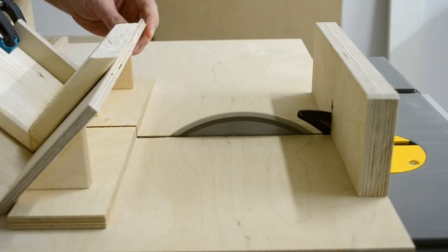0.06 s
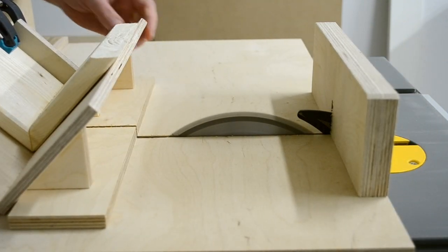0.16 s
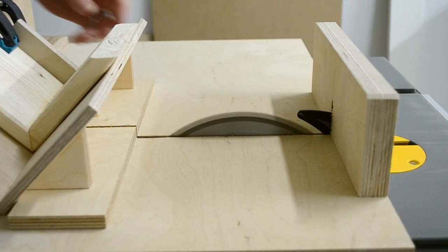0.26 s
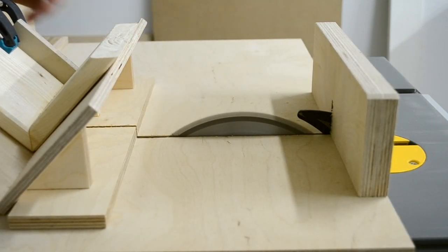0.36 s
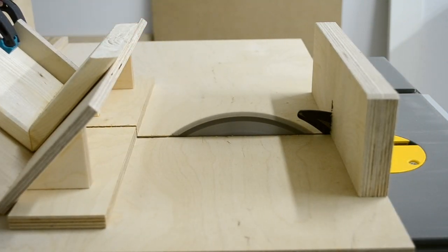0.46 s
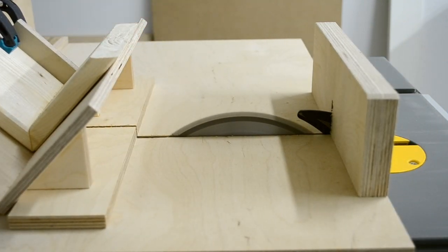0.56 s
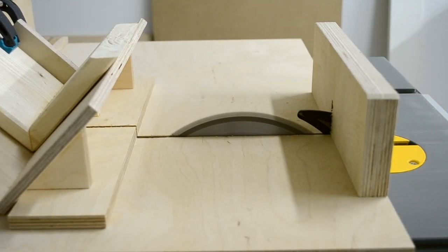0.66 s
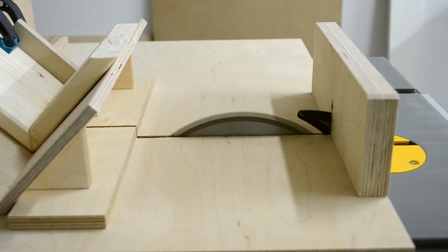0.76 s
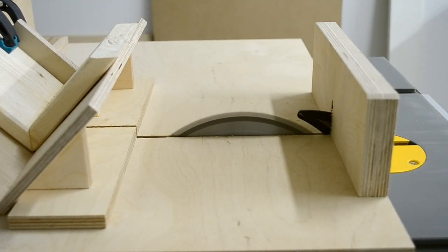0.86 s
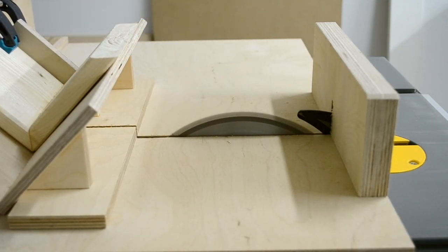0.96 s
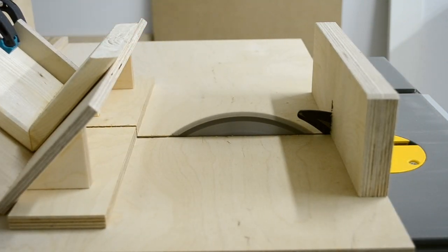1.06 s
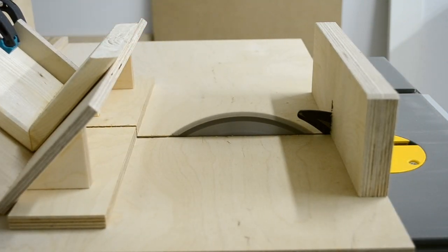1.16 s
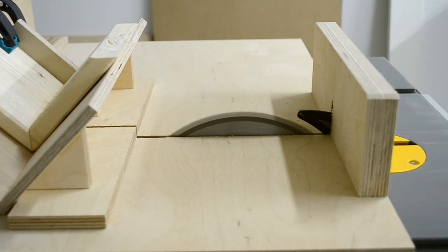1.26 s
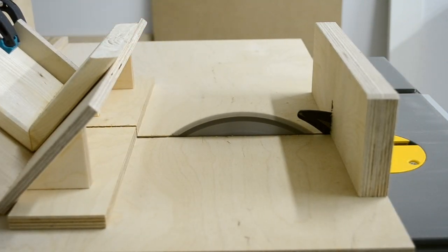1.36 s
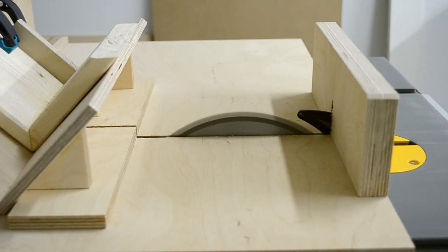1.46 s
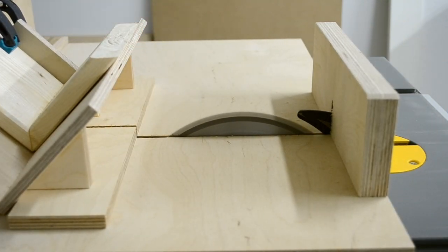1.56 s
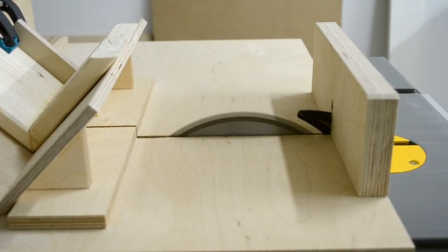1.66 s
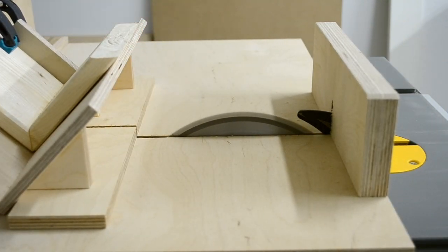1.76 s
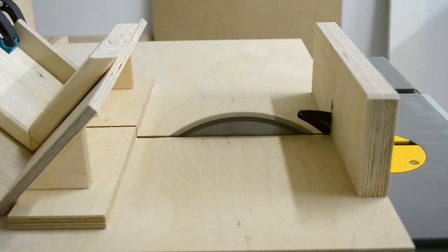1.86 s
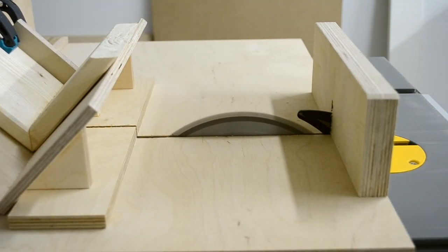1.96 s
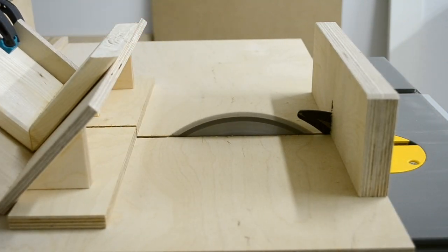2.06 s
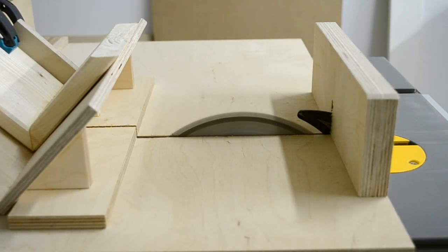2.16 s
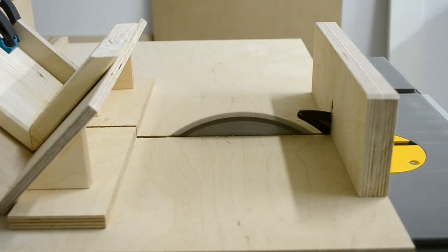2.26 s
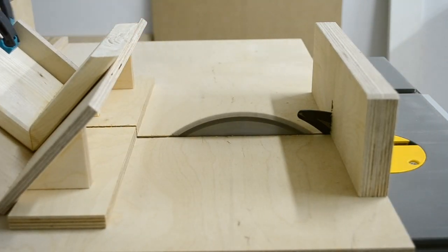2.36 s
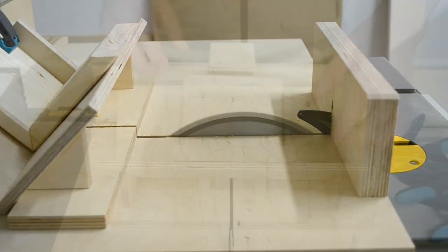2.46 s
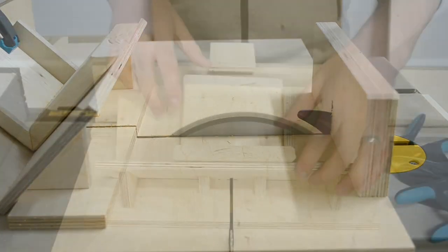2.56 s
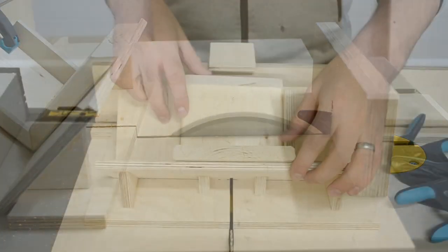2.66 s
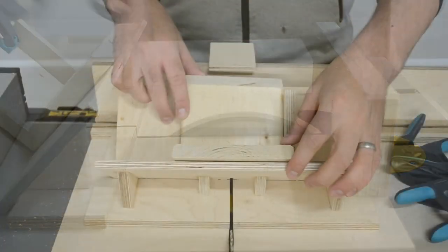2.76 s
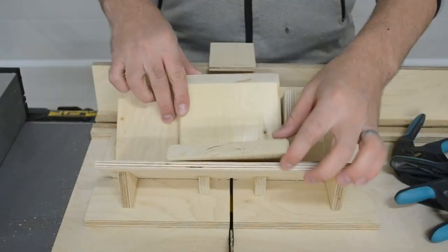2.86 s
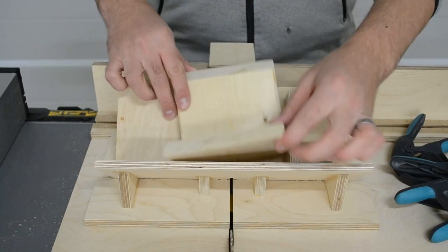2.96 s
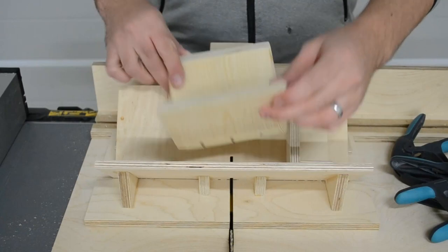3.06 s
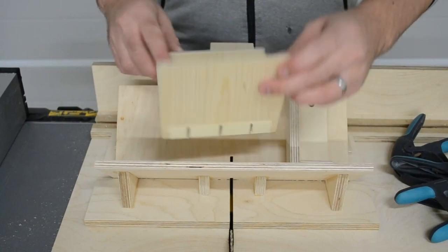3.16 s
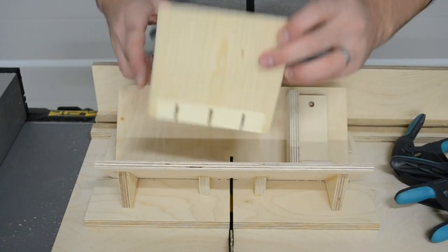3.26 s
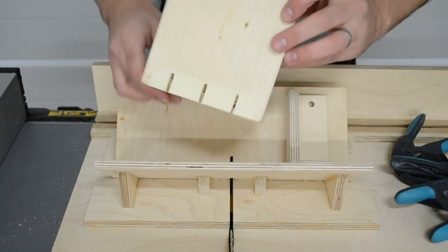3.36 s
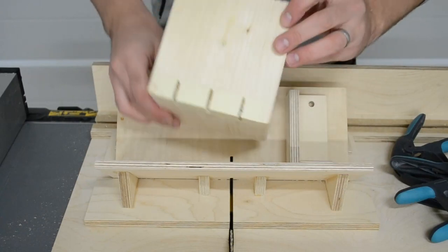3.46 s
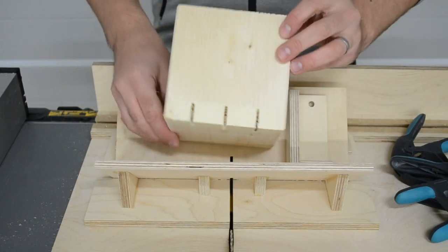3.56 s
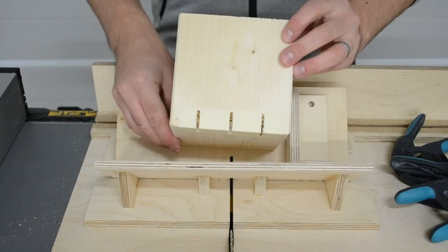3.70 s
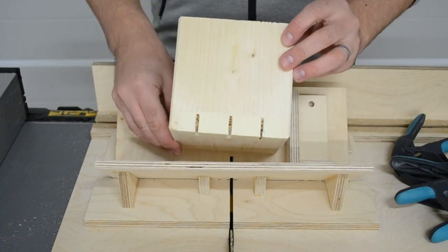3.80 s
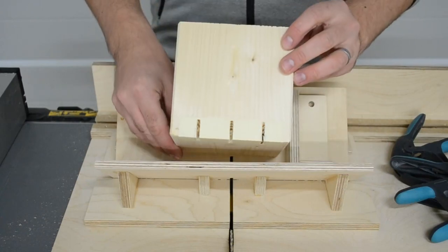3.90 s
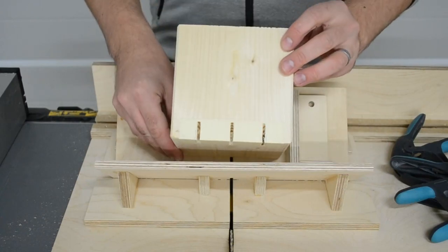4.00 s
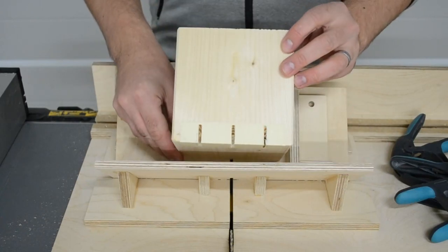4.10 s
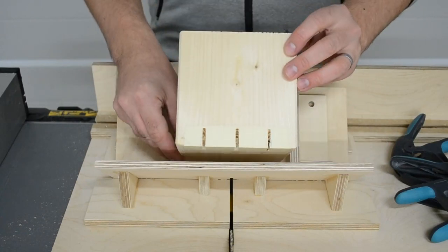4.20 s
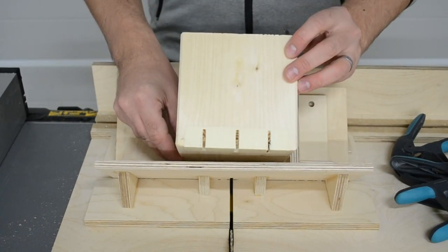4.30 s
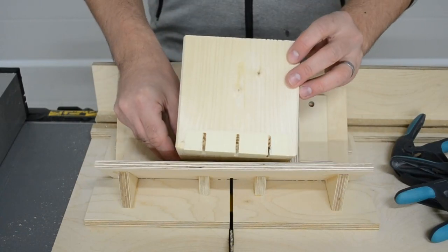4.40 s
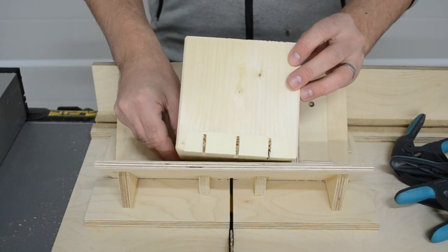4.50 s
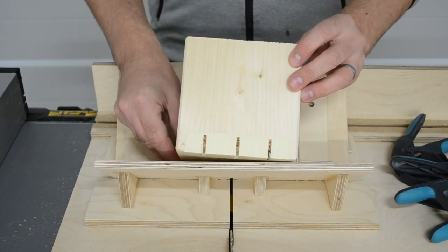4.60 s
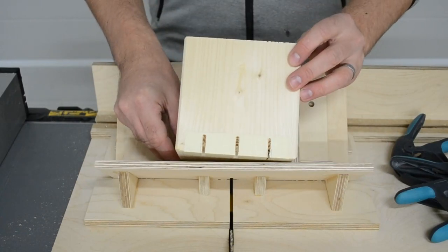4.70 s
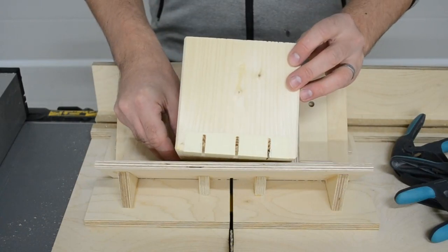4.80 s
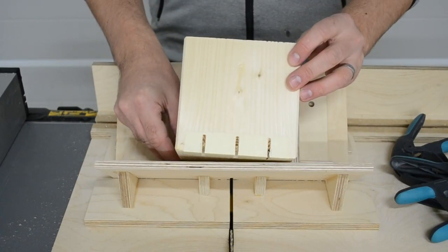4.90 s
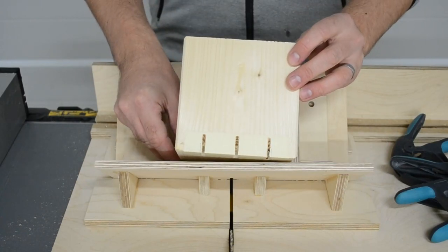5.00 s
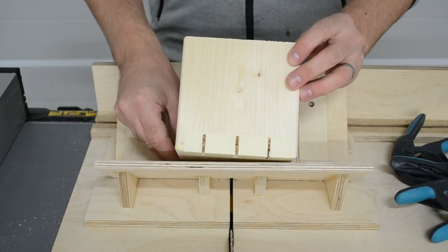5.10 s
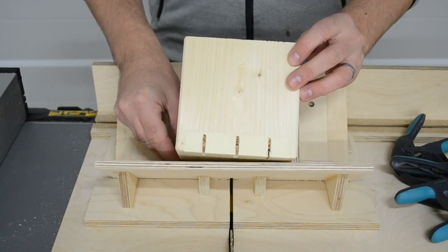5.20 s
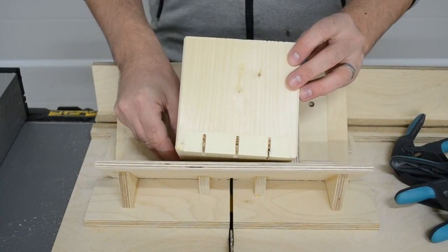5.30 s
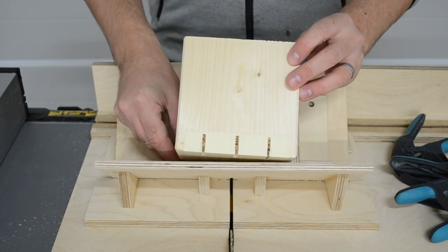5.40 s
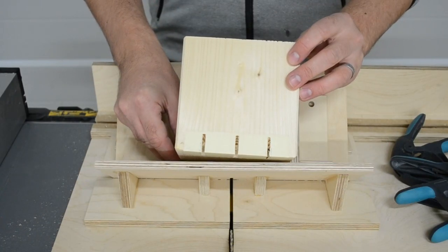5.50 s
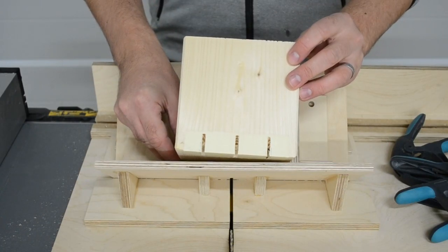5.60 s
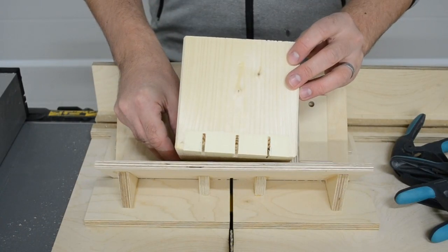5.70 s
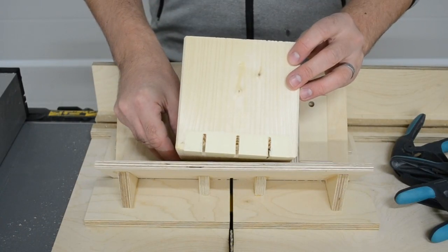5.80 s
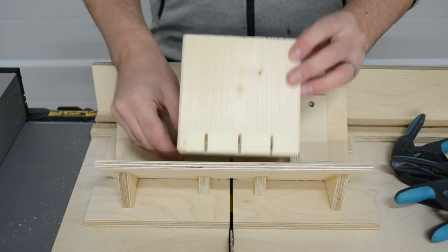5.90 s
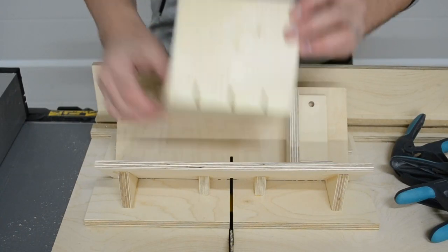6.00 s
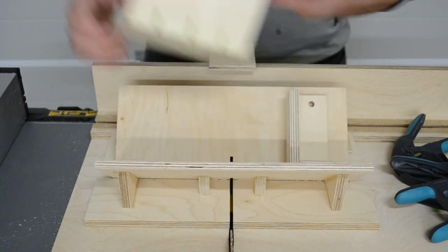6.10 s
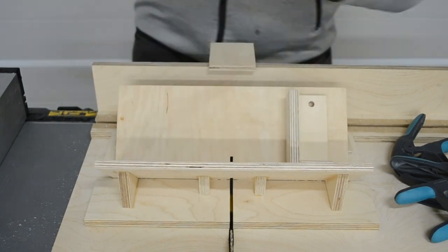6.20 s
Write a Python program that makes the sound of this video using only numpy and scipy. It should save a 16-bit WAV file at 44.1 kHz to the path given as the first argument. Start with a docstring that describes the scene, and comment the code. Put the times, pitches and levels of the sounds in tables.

```python
"""A table saw roars and is switched off: the tooth whine falls through the motor roar and the brake makes the
blade sing. The saw scene crossfades into a second one, where a hollow wooden box is turned, dropped into a
plywood jig, slid against its stop and lifted out, over the quiet hum of the shop, at one microphone. Narrow
noise and tones follow the teeth, shaped noise is the roar and the shop, and pushes and friction noise drive
the modes of the wood."""
import sys
import numpy as np
from scipy import signal
from scipy.io import wavfile
from scipy.ndimage import uniform_filter1d

SR = 44100
rng = np.random.default_rng(int(sys.argv[2]) if len(sys.argv) > 2 else 0)


def pcm_store(signal):
    """Save signal as 16-bit PCM."""
    levels = np.round(np.clip(np.atleast_2d(signal), -1, 1) * 32767)
    wavfile.write(sys.argv[1], SR, levels.astype(np.int16).T)


def voltage_ratio(decibels):
    """Convert decibels (scalar or array-like) to amplitude ratios, 20 dB per decade."""
    exponent = np.asarray(decibels, float) / 20
    return 10 ** exponent


N = 275594

# blows of the wood, peak levels: (time [s], box [dB], thud of the jig [dB], sharp tick [dB], high ping [dB])
BLOWS = [(2.922, -56, -63, -60, -72), (2.937, -52, -54, -60, -72), (3.089, -55, -55.5, -60, -54),
         (3.2537, -48, -77, -55, -46.5), (3.299, -57, -79, -72, -62), (3.35, -62, -72, -70, -53),
         (3.382, -64, -77, -70, -70), (3.411, -57, -75, -66, -70), (3.613, -69, -81, -69, -64),
         (3.656, -46, -57, -73, -78), (3.659, -36.5, -30.5, -71, -62), (3.69, -47, -52, -75, -75),
         (3.804, -47.5, -56, -73, -75), (4.331, -35, -49.5, -37.5, -56), (4.343, -38.5, -55, -65, -68),
         (4.416, -51, -54, -65, -68), (5.892, -65, -78, -62, -68), (6.097, -66, -83, -69, -66),
         (6.124, -70, -76, -67, -71), (6.146, -60, -82, -70, -72), (6.17, -57, -80, -70, -70),
         (6.221, -61, -77, -65, -64), (6.228, -60, -79, -60, -68)]
# modes of the hollow box: (frequency [Hz], width [Hz], relative power [dB])
BOX_MODES = [(990, 85, 0), (1100, 70, -6), (1225, 90, 0), (1480, 90, -13), (1780, 110, -9), (2280, 80, -15),
             (2480, 130, -17), (2850, 130, -22), (3600, 60, -16), (3910, 70, -20), (4780, 150, -12),
             (5440, 130, -14), (5830, 110, -18)]
# modes of the plywood jig: (frequency [Hz], width [Hz], relative power [dB])
JIG_MODES = [(180, 92, -12), (251, 78, -6.5), (344, 127, -4.5), (482, 182, 1), (800, 390, -12)]


def saw():
    """Spin-down: the tooth rate falls exponentially, faster once braked; whistles and roar colour follow it,
    while roar level, hum, flares and ringing have their own curves, times and pitches."""
    # motor roar: (time [s], level [dB])
    roar_curve = [(0, -43.5), (1.45, -43.5), (1.7, -47), (1.82, -51), (2.3, -58), (2.75, -66),
                  (2.95, -75.5)]
    t = np.arange(0, roar_curve[-1][0], 1 / SR)
    roar_db, = columns(roar_curve, t)
    full_hz, coast_tau_s = 3676, 2.9  # tooth whine at switch-off and its slow coasting fall
    brake_s, brake_tau_s, creep_hz = 1.545, 0.205, 300  # the brake pulls the whine towards a creep
    braked = np.maximum(t - brake_s, 0)  # seconds under the brake
    coasting_hz = full_hz * np.exp(-(t - braked) / coast_tau_s)
    hz = creep_hz + (coasting_hz - creep_hz) * np.exp(-braked / brake_tau_s)
    bitten = np.clip((t - brake_s) / 0.089 + 0.5, 0, 1)  # 0 before the brake bites, 1 after
    slowness = (full_hz - hz) / (full_hz - 2030)  # at 2030 Hz the roar has its full coasting colour
    air, shake, rub = rng.standard_normal((len(t), 3)).T

    whine = tooth_whine(t, hz, braked, bitten, air, shake)
    machine = whine + motor(t, roar_db, slowness, air)
    machine += blade(t, roar_db, braked, shake, whine)
    machine += brake(t, braked, shake, rub)
    out = np.zeros(N)
    out[:len(t)] = machine * np.clip((t[-1] - t) / 0.046, 0, 1)
    return out


def tooth_whine(t, hz, braked, bitten, air, shake):
    """Siren principle: uneven teeth chop the air into fuzzy whistles at fixed shares of the tooth rate."""
    rush_share, under_share = 0.928, 0.45  # the air rush and a motor whistle, as shares of the tooth pitch
    whine_db = -56 - 27 * braked + answer(hz)
    rush_db = -48 - 31 * bitten - 40 * braked  # the air around the teeth collapses under the brake
    # the octave speaks near one resonance at 4830 Hz until the brake bites
    free_octave_db = -66.5 + 3 * np.exp(-((2 * hz - 4830) / 503) ** 2)
    braked_octave_db = -69 - 8 * braked + answer(2 * hz)
    octave_db = free_octave_db * (1 - bitten) + braked_octave_db * bitten
    under_db = -63 + 4 * bitten - 30 * braked + answer(under_share * hz) * bitten

    whine = voltage_ratio(whine_db) * whistle(air, hz, 50)
    whine += voltage_ratio(rush_db) * whistle(shake, rush_share * hz, 740)
    whine += voltage_ratio(octave_db) * whistle(air, 2 * hz, 40)
    whine += voltage_ratio(under_db) * whistle(air, under_share * hz, 43)

    # a clear tone fades from the start; under the brake the tone clears again, with a trembling pitch
    tremble = 0.024 * evened(uniform_filter1d(uniform_filter1d(air, 900), 900)) * bitten
    phase = 2 * np.pi * np.cumsum(hz * (1 + tremble)) / SR
    clear = voltage_ratio(-53 - 14 * t)
    glide = bitten * voltage_ratio(-59 - 11 * braked + answer(hz))
    whine += (clear + glide) * np.cos(phase)
    whine += bitten * voltage_ratio(octave_db) * np.cos(2 * phase)
    whine += bitten * voltage_ratio(under_db) * np.cos(under_share * phase)
    return whine * np.clip((2.04 - t) / 0.079, 0, 1)  # the whine ends at 2.04 s


def answer(hz):
    """Forced resonance: boost in dB that the table gives a whistle at hz, with poor radiation at low pitch."""
    # the table answers as a whistle sweeps past: (frequency [Hz], span [Hz], boost [dB])
    table_modes = [(970, 130, 8), (658, 84, 3), (446, 59, 9)]
    boost = sum(db * np.exp(-((hz - mode_hz) / span) ** 2) for mode_hz, span, db in table_modes)
    return boost - 0.5 * np.maximum(420 - hz, 0)  # loses 0.5 dB per Hz below 420 Hz


def motor(t, roar_db, slowness, air):
    """Broadband source: turbulent roar darkens as the speed falls, with a partly tonal, wavering hum."""
    # roar at speed: (frequency [Hz], relative density [dB per Hz])
    fast = [(30, -49), (100, -16.5), (200, -27.5), (270, -14), (430, -5.5), (900, 0.5), (1450, -6),
            (2730, -1.5), (4000, -7), (6000, -17), (9150, -14.5), (11400, -32.5)]
    # roar of the slowed motor: (frequency [Hz], relative density [dB per Hz])
    slow = [(30, -65), (100, -23), (200, -33.5), (270, -12.5), (430, -16), (700, -7.5), (1500, -10.5),
            (2060, -10), (4000, -16), (6000, -22), (9500, -25), (10700, -34.5), (11400, -68)]
    # wavering hum: (time [s], frequency [Hz], peak level [dB])
    hum = [(0, 424, -57), (.35, 440, -58), (.9, 427, -62), (1.4, 426, -62), (1.75, 416, -60),
           (2.1, 420, -59), (2.35, 412, -64), (2.6, 416, -68), (2.9, 423, -72)]
    hum_hz, hum_db = columns(hum, t)
    roar = voltage_ratio(roar_db) * noise(fast, slow, slowness, 1.38, len(t))
    rough_hum = voltage_ratio(roar_db - 18) * whistle(air, hum_hz, 56)  # its level follows the roar
    clean_hum = voltage_ratio(hum_db) * np.sin(2 * np.pi * np.cumsum(hum_hz) / SR)
    return roar + rough_hum + clean_hum


def blade(t, roar_db, braked, shake, whine):
    """Forced vibration: motor shaking and the sweeping whine excite the modes of blade and table."""
    # blade and table modes: (frequency [Hz], width [Hz], relative power [dB])
    blade_modes = [(337, 3.8, -12), (447, 23, 6), (650, 25, -3), (671, 17, -3), (747, 16, -3),
                   (848, 3.5, 4.5), (963, 21, 3.5), (1545, 40, -9), (1700, 44, -3), (2050, 14, 8),
                   (2090, 23, -6), (2126, 21, -1), (2244, 18, -10), (2520, 36, -3), (2560, 20, -9),
                   (2673, 12, -6.5), (2797, 30, -1), (2976, 18, -19), (3350, 25, -10), (3680, 24, -19)]
    # against the roar: -12 dB at speed, towards -4 dB once braked, waking from 20 dB lower at the start
    share_db = -12 + 8 * (1 - np.exp(-braked / 0.39)) - 20 * np.exp(-t / 0.49)
    shaken = voltage_ratio(roar_db + share_db) * evened(ring(shake, blade_modes))
    return shaken + voltage_ratio(5.5) * ring(whine, blade_modes)


def brake(t, braked, shake, rub):
    """Friction-excited vibration: rubbing feeds high blade modes; a screech, flares and clean ringing join."""
    # high blade modes that sing: (frequency [Hz], width [Hz], relative power [dB])
    singing = [(5070, 140, 12.5), (6780, 69, -15), (6900, 60, -13), (7460, 43, 12), (8020, 46, 14),
               (8600, 80, 9.5), (9220, 93, 12), (10200, 90, 14), (10120, 150, 5)]
    # single blade modes flaring up at set times, before and under the brake:
    # (peak time [s], frequency [Hz], width [Hz], level [dB], length [s])
    flares = [(0.503, 2950, 27, -52, 0.11), (0.597, 2797, 22, -55, 0.19), (.78, 2670, 33, -48.5, 0.12),
              (.97, 2700, 25, -54, 0.16), (1.09, 2575, 22, -52, 0.065), (1.118, 2244, 23, -50, .2),
              (1.2, 2135, 30, -54.5, .2), (1.306, 2146, 45, -51.5, 0.09), (1.522, 2129, 38, -43.5, 0.083),
              (1.547, 2040, 40, -48.5, 0.064), (1.563, 2736, 46, -55, 0.19), (1.593, 1765, 56, -46, 0.036),
              (1.693, 1796, 100, -44.5, 0.017), (1.725, 2115, 78, -47.5, 0.027),
              (1.616, 3672, 66, -56.5, 0.33)]
    # modes that ring on cleanly: (frequency [Hz], level [dB], fade [dB per s])
    ringing = [(640, -52, 34), (829, -62, 13), (2050, -62, 14), (2130, -57, 14)]
    since_bite = t - 1.61
    # the outburst rises at 96 and falls at 68 dB per second
    bite_db = -49.5 - 96 * np.maximum(-since_bite, 0) - 68 * np.maximum(since_bite, 0)
    song = np.hypot(voltage_ratio(-60.5 - 7 * t), voltage_ratio(bite_db)) * evened(ring(rub, singing))
    screech_hz = 9670 - 3500 * np.clip(since_bite, -0.1, 0.4)  # a broad screech sinks through the bite
    song += voltage_ratio(bite_db - 15) * whistle(shake, screech_hz, 420)
    for s, mode_hz, width, db, length in flares:
        swell = np.exp(-2 * ((t - s) / length) ** 2)
        song += voltage_ratio(db) * swell * whistle(rub, mode_hz, width)
    waver = 1 + 0.002 * evened(uniform_filter1d(uniform_filter1d(rub, 3000), 3000))
    fade_in = np.clip(braked / 0.53, 0, 1)
    for mode_hz, db, db_per_s in ringing:
        tone = np.sin(2 * np.pi * mode_hz * np.cumsum(waver) / SR)
        song += fade_in * voltage_ratio(db - db_per_s * braked) * tone
    return song


def knocks():
    """Impact: a short contact force excites the modes of box and jig, with a bright tick and a high ping."""
    # edge striking edge: (frequency [Hz], width [Hz], relative power [dB])
    tick_modes = [(1870, 2800, -1), (3070, 860, 2), (5030, 320, -2.5), (7100, 2700, -5.5),
                  (9250, 1400, -10)]
    t = np.arange(4096) / SR
    push = np.exp(-0.5 * ((t - 0.0006) / 0.000084) ** 2)  # wood on wood: a contact of under a millisecond
    box, jig = ring(push, BOX_MODES), ring(push, JIG_MODES)
    impulse = 1.0 * (np.arange(len(t)) == 20)
    ping = ring(impulse, BOX_MODES[8:])  # hard corners ping the high modes
    out = np.zeros(N + len(t))
    grits = rng.standard_normal((len(BLOWS), len(t)))
    for (s, *levels_db), grit in zip(BLOWS, grits):
        tick = ring(grit * voltage_ratio(-60 * t / 0.011), tick_modes)
        start = round(s * SR)
        for db, part in zip(levels_db, (box, jig, tick, ping)):
            out[start:][:len(t)] += voltage_ratio(db) * part / abs(part).max()
    return out[:N]


def rubs():
    """Friction: fine grains of contact noise drive the modes of box and jig, and the grain hisses."""
    # box sliding on the jig: (peak time [s], length [s], box [dB], jig [dB], grip [0-1]);
    # grip 0 leaves the lowest modes free, grip 1 the seating mode just above them
    slides = [(2.958, 0.12, -66.5, -61.5, 0.8), (3.07, 0.12, -69, -86, 0.1), (3.297, .035, -66, -90, 0.2),
              (3.354, 0.025, -58.5, -90, .05), (3.39, .016, -63, -90, 0.1), (3.425, .02, -65.5, -88, 0.1),
              (3.467, 0.018, -68, -90, .05), (3.54, 0.09, -73, -75.5, .5), (3.807, 0.11, -53, -73, 0.26),
              (3.95, 0.15, -58.5, -77, 0.62), (4.084, 0.15, -57.5, -71, 0.58),
              (4.165, 0.046, -67, -80, .95), (4.29, 0.18, -56, -63.5, 0.4), (5.916, 0.14, -73.5, -78, 0.33),
              (6.113, 0.26, -70, -95, 0.25), (6.137, .03, -72, -95, .1), (6.17, 0.018, -66, -95, .1),
              (6.2, .03, -72, -95, .8), (6.226, 0.017, -56.5, -93, 0.3)]
    # fingers brushing the grain: (peak time [s], length [s], hiss [dB], squeak [dB])
    brushes = [(2.962, 0.17, -65.5, -86), (3.136, 0.24, -75.5, -88), (3.2, 0.022, -80, -70.5),
               (3.3, 0.059, -71, -83), (3.355, 0.049, -66, -78), (3.44, 0.28, -73, -75.5),
               (3.619, 0.026, -68, -86), (3.774, 0.15, -77, -69.5), (3.858, 0.092, -81, -78),
               (3.963, 0.12, -70.5, -68.5), (4.078, 0.14, -75.5, -71), (4.255, 0.11, -74.5, -73),
               (5.91, 0.06, -72, -72.5), (6.042, 0.19, -70.5, -74), (6.148, 0.093, -67.5, -74),
               (6.227, 0.083, -62, -69)]
    # pitch of the seating mode, higher as the box seats: (time [s], share of its frequency [1])
    seating = [(3.75, 0.86), (3.92, 1.04), (4.05, 0.99), (4.35, 1.09), (4.45, 1.11), (5.9, 1.03)]
    # hiss of wood on wood: (frequency [Hz], relative density [dB per Hz])
    grain = [(1470, -12), (2500, -1), (3260, -6), (4750, -6.5), (7120, -8.5), (7930, -8), (9780, -8.5),
             (11400, -27), (14800, -53), (22000, -120)]
    # powers over time
    low, seated, middle, high, jig, hiss, thud = np.zeros((7, N))
    for s, length, box_db, jig_db, grip in slides:
        held_db = 16.5 * (1 - grip) ** 2
        low += stroke(s, length, box_db - 16.5 * grip ** 2)
        seated += stroke(s, length, box_db - held_db)
        middle += stroke(s, length, box_db - 6.5 - held_db)
        jig += stroke(s, length, jig_db)
    for s, length, hiss_db, squeak_db in brushes:
        hiss += stroke(s, length, hiss_db)
        middle += stroke(s, length, hiss_db - 3)
        high += stroke(s, length, squeak_db)
    # after each blow box and jig chatter on, below the blow
    for s, box_db, jig_db, tick_db, _ in BLOWS:
        edge = chatter(s, tick_db - 21, 107)  # sharp blows wake the upper modes
        low += chatter(s, box_db - 21, 107)
        seated += voltage_ratio(-3) * edge
        middle += voltage_ratio(-9) * edge
        hiss += voltage_ratio(-20) * edge
        high += chatter(s, tick_db - 34, 107)
        thud += chatter(s, tick_db - 23.5, 69)  # a sharp blow on the stop shakes the jig's low modes
        jig += chatter(s, jig_db - 19, 93)

    box_noise, jig_noise, size = rng.standard_normal((N, 3)).T
    catch = voltage_ratio(1.26 * evened(uniform_filter1d(size, 300)))  # the contact catches and slips
    grains = box_noise * catch
    lift, = columns(seating, np.arange(N) / SR)
    # rubbing broadens the three lowest modes
    low_modes = [(hz, 1.5 * w, db) for hz, w, db in BOX_MODES[:2]]
    seating_modes = [(hz * lift, 1.2 * w, db) for hz, w, db in BOX_MODES[2:3]]
    high_modes = BOX_MODES[8:]
    drift = uniform_filter1d(rng.standard_normal((N // 256 + 1, len(high_modes))), 14, axis=0)
    wander = voltage_ratio(2.5 * evened(drift)).repeat(256, axis=0)[:N].T  # each high mode comes and goes

    # the main modes stand out steeply: two passes
    sound = np.sqrt(low) * evened(ring(ring(grains, low_modes), low_modes))
    sound += np.sqrt(seated) * evened(ring(ring(grains, seating_modes), seating_modes))
    sound += np.sqrt(middle) * evened(ring(grains, BOX_MODES[3:8]))
    squeak = sum(ring(grains * w, [mode]) for w, mode in zip(wander, high_modes))
    sound += np.sqrt(high) * evened(squeak)
    sound += np.sqrt(jig) * evened(ring(jig_noise, JIG_MODES))
    sound += np.sqrt(thud) * evened(ring(ring(size, JIG_MODES[:2]), JIG_MODES[:2]))
    return sound + np.sqrt(hiss) * noise(grain, grain, np.zeros(N), 3.5, N) * catch


def stroke(s, length, db):
    """Friction envelope: power of a swell peaking at s, 14 dB down one length later; it rises faster."""
    u = (np.arange(N) / SR - s) / length
    u = np.where(u < 0, u / 0.63, u)
    return voltage_ratio(db - 14 * np.minimum(u ** 2, 20)) ** 2


def chatter(s, db, db_per_s):
    """Exponential decay: power of the chatter that swells in over 22 ms after a blow at s and dies away."""
    since = np.arange(N) / SR - s
    return np.clip(since / 0.022, 0, 1) * voltage_ratio(db - db_per_s * np.maximum(since, 0)) ** 2


def shop():
    """Noise of fixed colour: hum and air of the workshop, crossfaded in by hand as the saw scene fades out."""
    # (frequency [Hz], relative density [dB per Hz])
    colour = [(25, -15), (60, -17), (120, -7.5), (240, -3), (500, -2.5), (860, -2.5), (1670, -6.5),
              (3330, -12.5), (6000, -20.5), (9000, -27.5), (11400, -41)]
    # (time [s], level [dB])
    level = [(0, -70), (2.3, -83), (2.9, -68.5), (4.5, -69), (6.3, -70)]
    level_db, = columns(level, np.arange(N) / SR)
    return voltage_ratio(level_db) * noise(colour, colour, np.zeros(N), 0.35, N)


def room(x):
    """Reverberation: sparse reflections of random sign, each band dying exponentially at its own speed."""
    # (frequency [Hz], time to fall 60 dB [s])
    decay = [(200, 0.8), (600, 0.51), (1500, 0.64), (4000, 0.3), (10000, 0.36)]
    taps = np.zeros(SR)
    at = np.arange(80, SR - 20, 20)  # one tap in every 20 samples
    taps[at + rng.integers(0, 20, len(at))] = rng.choice([-1.0, 1.0], len(at))
    hz, t, z = signal.stft(taps, SR, nperseg=256)
    t60 = np.maximum(read(decay, hz), 0.05)[:, None]
    tail = signal.istft(z * voltage_ratio(-60 * t / t60), SR, nperseg=256)[1]
    return signal.fftconvolve(x, tail / np.linalg.norm(tail))[:N]


def resonate(x, hz, width):
    """Heterodyne resonance of gain 1: shifts hz (a number or curve) to zero, smooths, and shifts back."""
    turn = np.exp(2j * np.pi * np.cumsum(hz * np.ones(len(x))) / SR)
    r = np.exp(-np.pi * abs(width) / SR)
    return 2 * (turn * signal.lfilter([1 - r], [1, -r], x / turn)).real


def ring(x, modes):
    """Modal superposition: sums a body's resonances to x, signs alternating; dB gives the power of each."""
    return sum((-1) ** k * voltage_ratio(db) * resonate(x, hz, w) / np.sqrt(abs(w))
               for k, (hz, w, db) in enumerate(modes))


def whistle(x, hz, width):
    """Narrow-band noise: x through a steep double resonance, at an rms of 1."""
    return evened(resonate(resonate(x, hz, width), hz, width))


def noise(first, second, blend, patchy_db, length):
    """Coloured noise: random short-time spectra of rms 1, blended between two colours, in drifting patches."""
    frames, hz = length // 256 + 5, np.fft.rfftfreq(1024, 1 / SR)
    a, b, patches = rng.standard_normal((frames, 513, 3)).T
    patches = evened(uniform_filter1d(uniform_filter1d(patches, 9, 0), 12, 1))
    share = np.clip(blend, 0, 1)[np.minimum(np.arange(frames) * 256, length - 1)]
    colour = voltage_ratio(read(first, hz)[:, None] * (1 - share) + read(second, hz)[:, None] * share)
    colour /= np.sqrt((colour ** 2).mean(0))
    spectra = (a + 1j * b) * colour * voltage_ratio(patchy_db * patches)
    return evened(signal.istft(spectra, nperseg=1024, noverlap=768)[1][:length])


def evened(x):
    """Power normalisation: scales to an rms of 1."""
    return x / np.sqrt(np.mean(x ** 2) + 1e-20)


def read(points, hz):
    """Interpolation on a logarithmic frequency axis, from a table of (frequency [Hz], value)."""
    f, value = np.transpose(points)
    return np.interp(np.log(hz + 1), np.log(f + 1), value)


def columns(rows, t):
    """Linear interpolation in time: joins the rows of a curve by straight lines."""
    s, *values = np.transpose(rows)
    return [np.interp(t, s, v) for v in values]


def scene():
    """Superposition: direct and reverberant sound add at one microphone, copied to both channels."""
    machine, blows = saw(), knocks()
    low_cut = signal.butter(2, 170, "high", fs=SR, output="sos")  # small bodies radiate little bass
    near = signal.sosfilt(low_cut, machine + rubs() + blows)
    mix = near + room(voltage_ratio(-6.5) * blows + voltage_ratio(-11.5) * near) + shop()
    return np.array([mix, mix])


def top_cut(x):
    """Nothing passes above the cut-off."""
    return signal.sosfilt(signal.butter(12, 11540, fs=SR, output="sos"), x)


def record(dry):
    """Linear filtering: a narrow dip in the microphone's treble and a band limit, then faint dither."""
    dipped = dry[0] - 1.03 * resonate(dry[0], 7880, 530)
    low_pass = signal.firwin(511, 11540, window=("kaiser", 9), fs=SR)
    limited = signal.oaconvolve(dipped, low_pass, "same")
    dithered = limited + voltage_ratio(-100) * rng.standard_normal(N)
    return top_cut(np.array([dithered, dithered]))


dry = scene()
out = record(dry)
pcm_store(out)
```